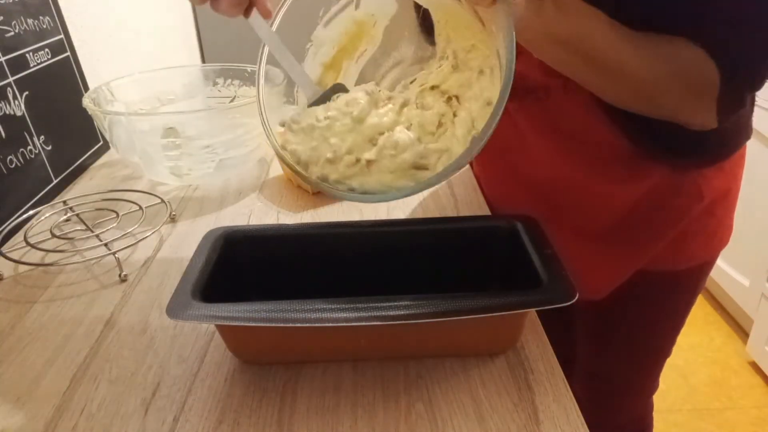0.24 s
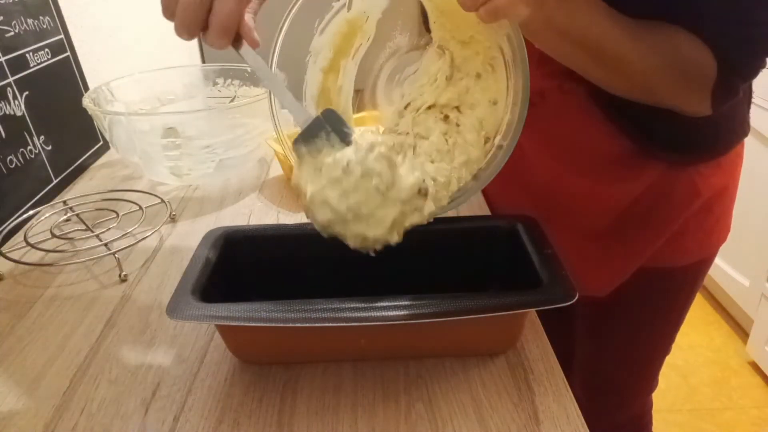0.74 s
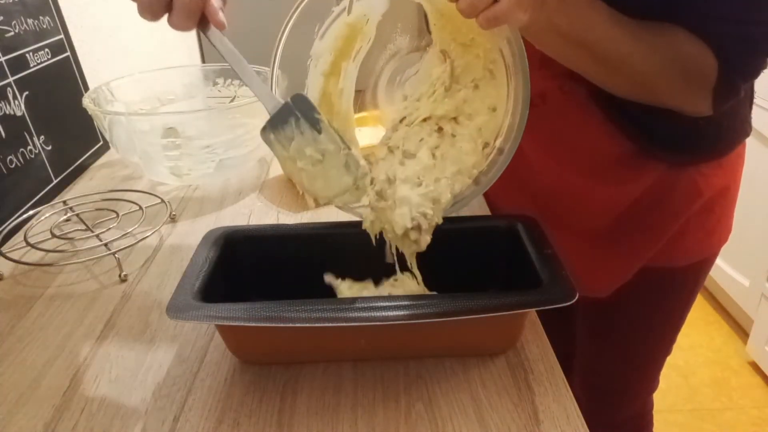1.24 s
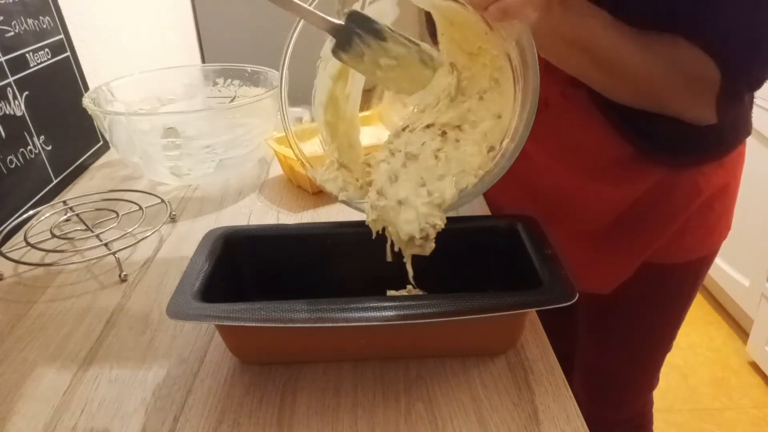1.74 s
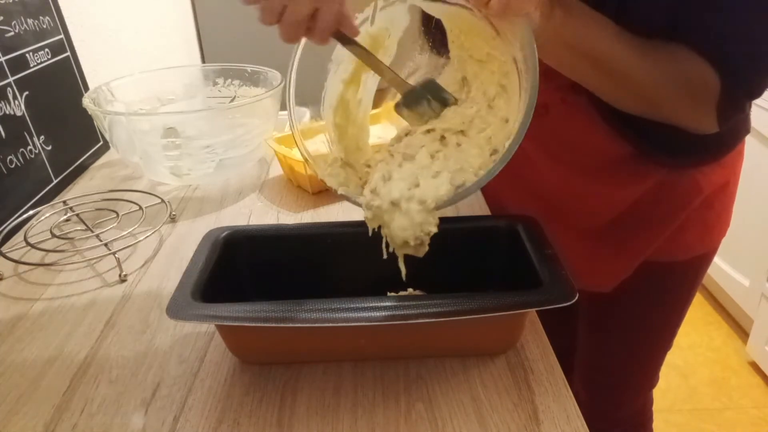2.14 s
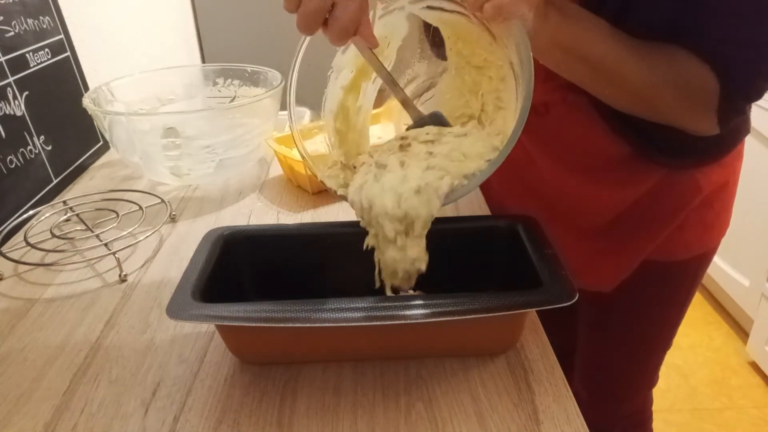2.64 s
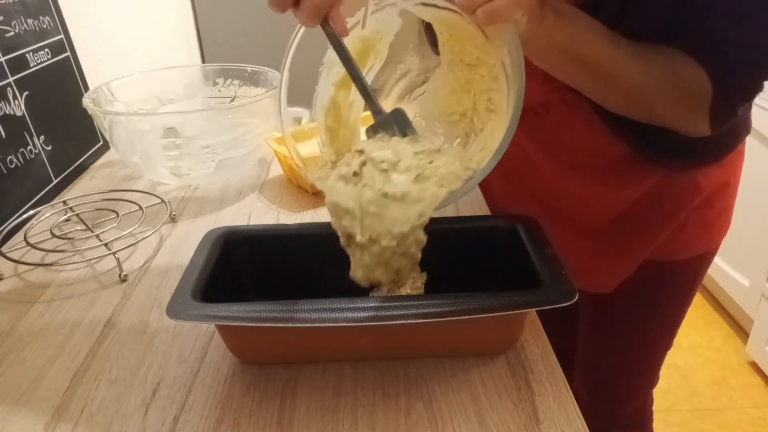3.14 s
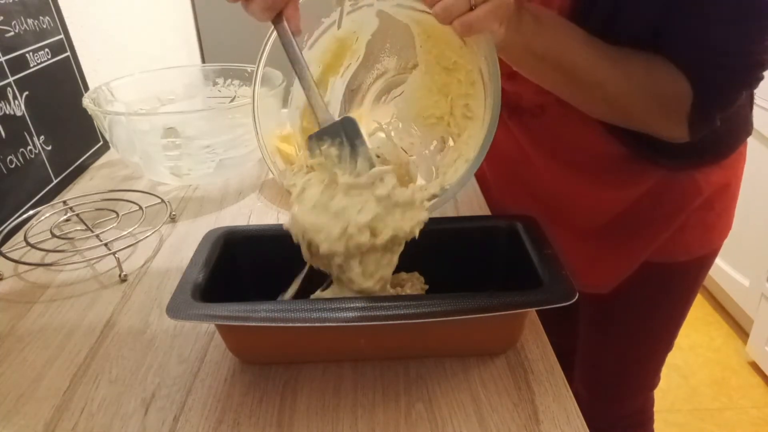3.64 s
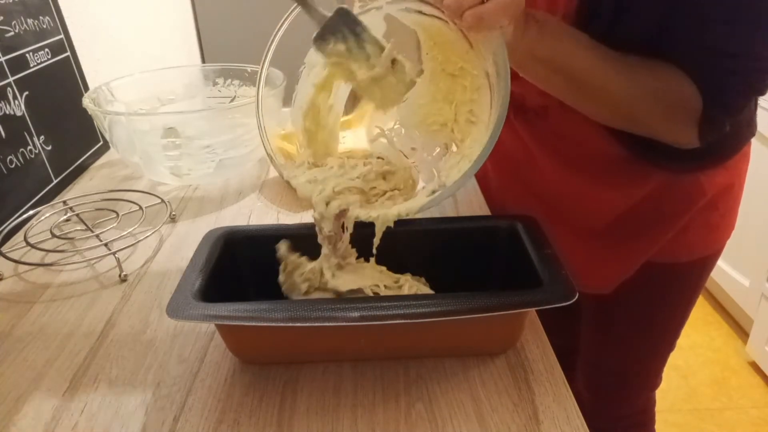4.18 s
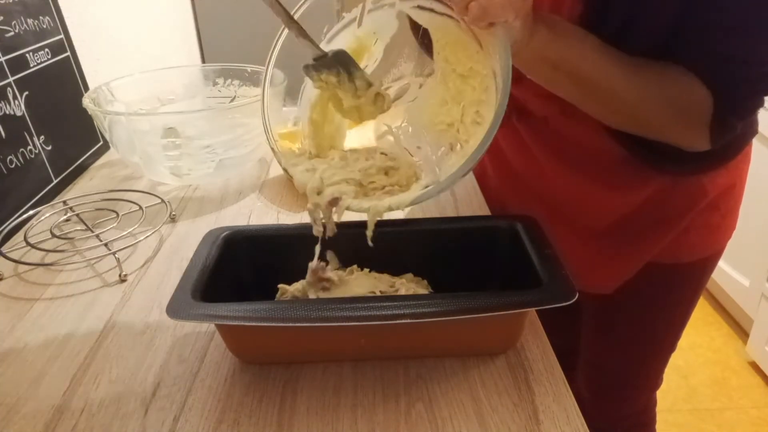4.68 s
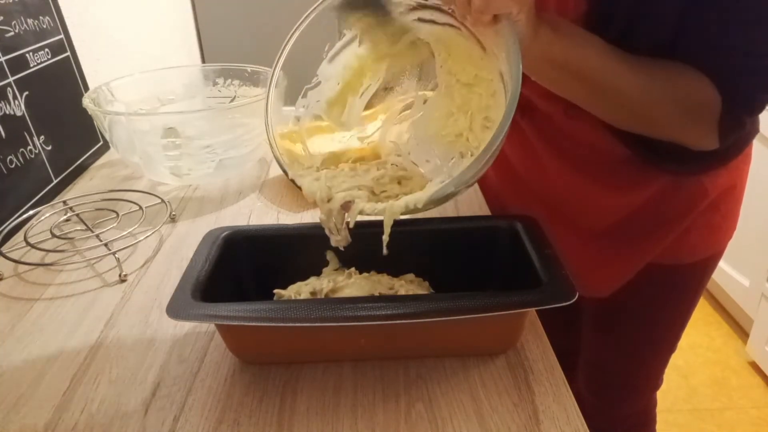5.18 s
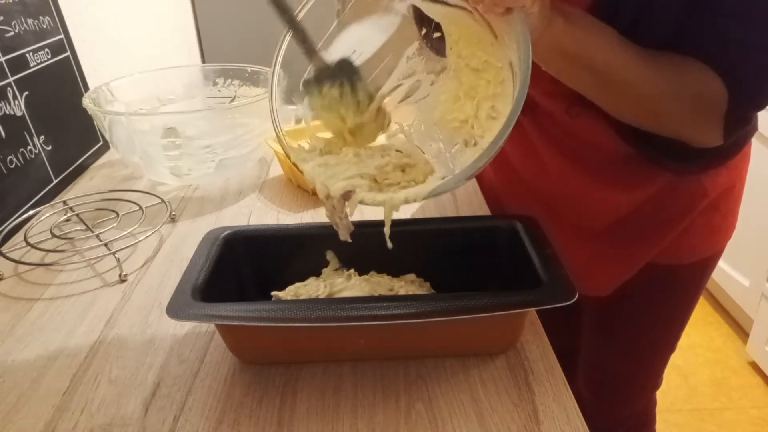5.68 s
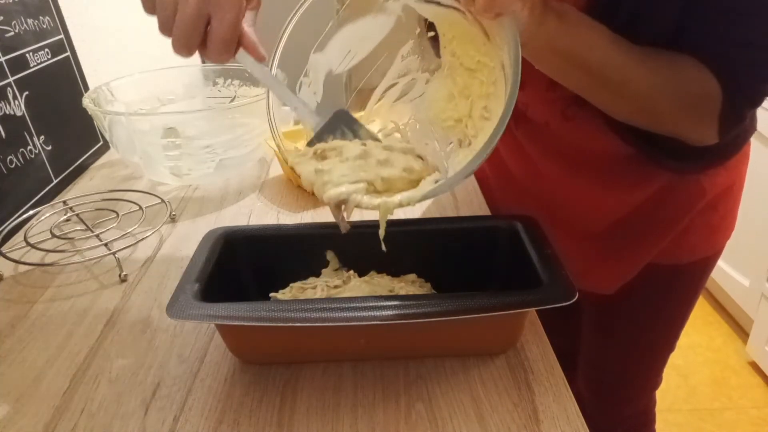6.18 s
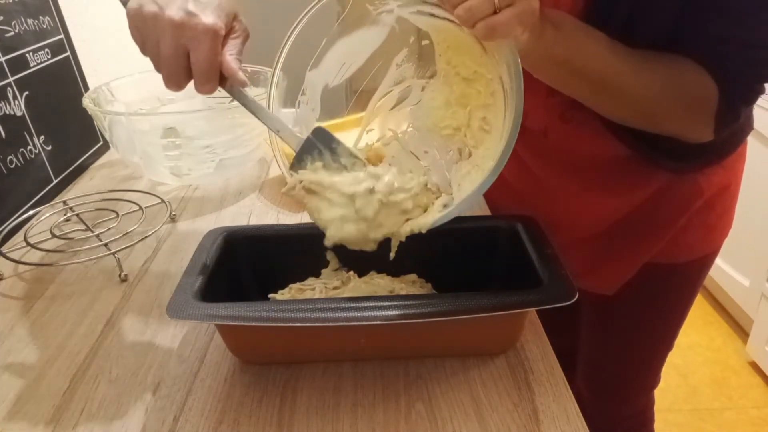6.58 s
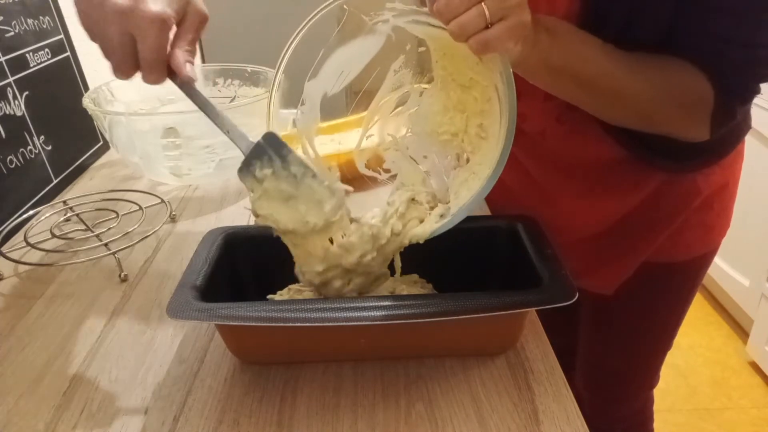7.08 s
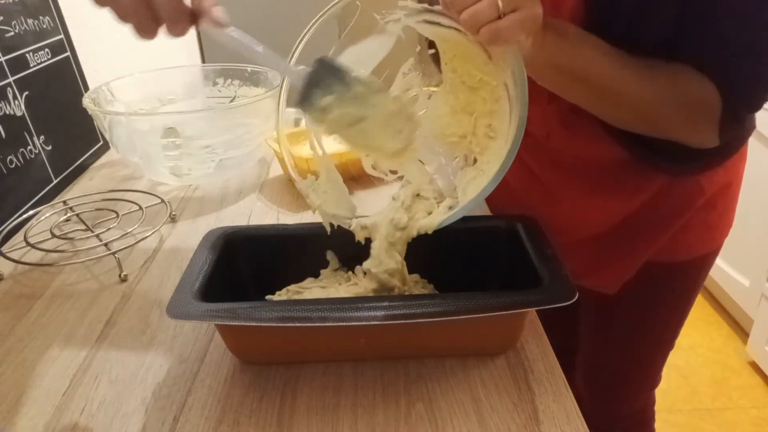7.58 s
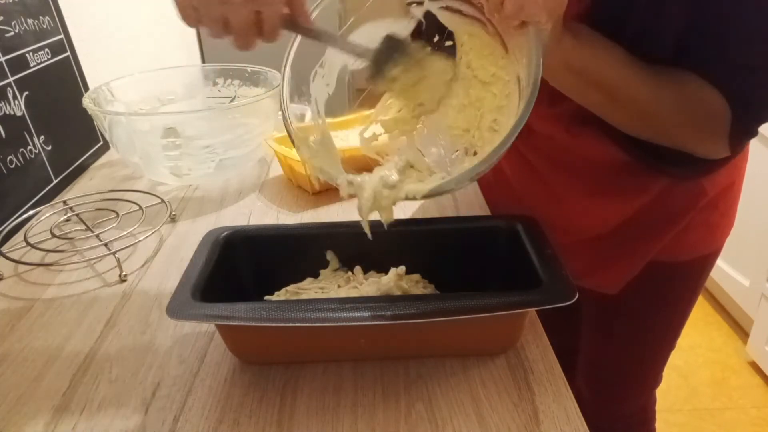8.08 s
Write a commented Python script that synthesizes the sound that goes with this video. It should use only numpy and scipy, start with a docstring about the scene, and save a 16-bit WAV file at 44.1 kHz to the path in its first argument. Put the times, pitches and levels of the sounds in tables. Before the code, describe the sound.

A spatula clacks on a glass bowl while sticky batter smacks softly and thuds into a metal tin, over a low hum.

```python
"""Scraping batter into a loaf tin.

A small, live kitchen, heard through one microphone. A spatula knocks and rubs on a glass bowl whose
ring is damped by batter. The sticky mass squelches, smacks and crackles as it is pushed and torn,
and lumps thud into the metal tin. The tiled room answers, and an appliance hums low underneath."""
import sys
import numpy as np
from scipy import signal
from scipy.fft import rfft, irfft, next_fast_len
from scipy.io import wavfile
from scipy.ndimage import uniform_filter1d, map_coordinates

SR = 44100
rng = np.random.default_rng(int(sys.argv[2]) if len(sys.argv) > 2 else 0)


def unload_audio(sound):
    """Save the sound as a 16-bit wav file, at the path given as the first command line argument."""
    columns = np.transpose(np.atleast_2d(sound))
    # keep every value between -1 and 1, then stretch to whole-number steps
    steps = np.round(np.clip(columns, -1, 1) * 32767)
    wavfile.write(sys.argv[1], SR, steps.astype(np.int16))


N = 366912
TIME, RING_TIME = np.arange(N) / SR, np.arange(SR // 2) / SR

# ringing modes of the batter-damped bowl, plus the microphone's bright peak near 9.5 kHz:
# f/Hz, relative level/dB, t60/s
BOWL_AND_MIC = [(626, -3.5, .14), (1285, -6, 0.26), (1476, -3.5, .22), (2124, -3, .12), (2324, -3.5, .2),
                (2959, -5.5, .1), (3480, -3.5, .16), (4160, -2.5, 0.14), (4400, -1.5, .38),
                (5156, -11, 0.16), (5640, -6, .16), (7960, -7, .15), (9040, -3, .15), (9400, -3.5, .17)]
# spectrum of the hard contact at the microphone: f/Hz, relative level/dB
CLACK_SPECTRUM = [(120, -34.5), (330, -7), (580, 3.5), (760, -4), (1080, -1.5), (1400, -1), (1720, -8),
                  (2200, -4.5), (4100, -1.5), (5000, -6.5), (6400, -10.5), (7900, -1), (9600, -1.5),
                  (11800, -9.5), (15000, -20.5)]
# spatula on glass; grip and batter shift the lowest wall mode:
# t/s, relative level/dB, tilt/(dB per octave), relative ring/dB, wall mode f/Hz, its relative level/dB
KNOCK_HITS = [(4.5524, -15, -0.36, -11.5, 610.6, -3), (4.663, -35.5, 2.5, -2, 610, -27),
              (4.676, -35, 2, -1.5, 620, -24), (5.9773, -24, 0.8, -20.5, 452, -10),
              (7.921, -18.5, 1, -15.5, 565, -1.5)]
def knocks(wall_t60=.11):
    """The spatula's hard edge clacks on the bowl, which rings briefly out into the room."""
    out = np.zeros(N)
    for s, db, tilt_db, ring_db, wall_hz, wall_db in KNOCK_HITS:
        contact = burst(t60=.02, rise=.001)  # the blade first squeezes through a film of batter
        clack = blow(colour(contact, lambda hz: along(CLACK_SPECTRUM, hz) + resonances(hz)))
        body = clack + amp(ring_db - 1) * blow(ring(BOWL_AND_MIC))
        body = colour(body, lambda hz: tilt_db * np.log2(np.maximum(hz, 200) / 3000))
        wall = blow(np.sin(2 * np.pi * wall_hz * RING_TIME) * amp(-60 * RING_TIME / wall_t60))
        add(out, s, amp(db + 5) * kitchen(body, wet_db=-1.5))
        add(out, s, amp(db + wall_db) * kitchen(wall, wet_db=-12))
    return low_cut(out, edge_hz=270)


def resonances(hz):
    """Boost in dB of contact noise near the bowl's modes and the microphone's bright peak."""
    peaks = sum(amp(db) ** 2 * np.exp(-((hz - peak_hz) / (55 + .018 * peak_hz)) ** 2)
                for peak_hz, db, _ in BOWL_AND_MIC)
    return 10 * np.log10(1 + 5 * peaks)


# modes of the loaf tin: f/Hz, relative level/dB, t60/s
TIN_MODES = [(335, -5, 0.065), (612, 3, 0.054), (844, -32, 0.062), (1005, 6, 0.046), (1300, 0, 0.058),
             (1590, -3.5, 0.086), (1820, -7.5, 0.029)]
# spectrum of the wet splash: f/Hz, relative level/dB
SPLASH_SPECTRUM = [(500, 4), (1500, 8.5), (3000, 3.5), (5500, -4), (9000, -6.5), (11000, -3.5),
                   (15500, -12)]
# lumps landing: t/s, level/dB, splash against thud/dB, pitch ratio (a load of batter lowers the modes)
LUMP_DROPS = [(1.113, -28, -6.5, 0.99), (1.118, -23.5, -24, 0.99), (1.182, -46, -17, 1.2),
              (1.236, -50, -16, 1), (3.759, -45, -1, .85)]
def lumps():
    """Soft lumps thud into the tin's sheet metal with a small splash."""
    out = np.zeros(N)
    for s, db, splash_db, ratio in LUMP_DROPS:
        splash = blow(colour(burst(t60=.064, rise=.0034), lambda hz: along(SPLASH_SPECTRUM, hz)))
        thud = blow(ring([(ratio * hz, mode_db, t60) for hz, mode_db, t60 in TIN_MODES]))
        add(out, s, kitchen(amp(db) * (thud + amp(splash_db) * splash), wet_db=-1.5))
    return out


# the loudest air pockets bursting in the batter: t/s, level/dB, f/Hz, width/octaves
AIR_POCKETS = [(0.436, -51, 10700, .21), (0.7446, -49.5, 9400, .05), (1.025, -53.5, 9900, .2),
               (2.024, -49.5, 8200, 0.55), (2.0496, -44, 9400, .23), (2.083, -48, 9000, .2),
               (2.18, -47, 8000, 1), (2.1863, -29, 6200, 0.41), (2.2788, -33.5, 9700, 0.36),
               (2.3597, -47.5, 10900, 0.45), (2.3966, -50, 13000, 0.4), (2.5117, -46.5, 9800, 0.18),
               (2.8306, -48.5, 6300, 0.21), (2.9178, -51.5, 10000, .22), (3.508, -48.5, 10100, .21),
               (3.759, -43, 8670, 0.17), (5.831, -57, 9100, 0.41), (7.1202, -62, 8056, 0.39),
               (8.2054, -49, 7970, 0.76), (8.2946, -48, 10500, .4), (8.311, -44, 10800, 0.27)]
def smacks():
    """An air pocket snaps open and rings for a few cycles; torn batter fizzes after it."""
    out = np.zeros(N)
    for s, db, pitch_hz, width in AIR_POCKETS:
        snap = blow(burst(t60=.004))
        fizz = amp(-4) * blow(burst(t60=.035))
        cavity = lambda hz: -20 * np.log10(1 + (np.log2((hz + 1) / pitch_hz) / width) ** 2 / 2)
        add(out, s, kitchen(amp(db) * blow(colour(snap + fizz, cavity)), wet_db=-7))
    return out


# spectrum of the blade rubbing on glass, at the microphone: f/Hz, relative level/dB
RUB_SPECTRUM = [(200, -15), (550, 3), (1200, 4.5), (1800, -3.5), (4300, 1), (6300, -6), (9400, -0.5),
                (12000, -12), (15500, -19.5)]
# rubbing strokes: t/s at full pressure, hold/s, relative level/dB
RUB_STROKES = [(.005, 0.039, -50), (.25, 0.049, -63.5), (2.026, .01, -69), (6.25, 0.12, -64.5),
               (7.8, 0.022, -69), (8.2, 0.016, -67), (8.31, .01, -68)]
def scraping():
    """Tiny slips of the blade excite the bowl's modes; the microphone hears mostly direct sound."""
    pressure = gestures(RUB_STROKES, rise_db_per_s=300, fall_db_per_s=140)
    slips = rng.standard_normal(N) * amp(2.36 * wobble(160))
    rub = pressure * unit(colour(slips, lambda hz: along(RUB_SPECTRUM, hz) + .8 * resonances(hz)))
    ringing = ring(BOWL_AND_MIC)
    singing = signal.fftconvolve(pressure * unit(slips), ringing / np.linalg.norm(ringing))[:N]
    return kitchen(amp(-2) * rub + amp(-7.5) * singing, wet_db=-11)[:N]


# colour of the wet crackle at the microphone: f/Hz, relative gain/dB
CRACKLE_COLOUR = [(1500, -14.5), (4000, -11.5), (7500, -12.5), (9600, 1.5), (11500, -8), (15500, -2)]
# the blade pulls at the batter, or a lump tears away: t/s at full strength, hold/s, relative level/dB
BATTER_PULLS = [(.02, 0.43, -73), (1.15, 0.037, -65.5), (2.035, 0.034, -55), (2.3, 0.34, -66),
                (3.0, .1, -71), (3.55, .15, -71), (3.78, .04, -67.5), (4.05, 0.09, -72.5), (5.5, .1, -74.5),
                (6.1, 0.21, -72.5), (7.78, 0.072, -79.5), (8.15, .03, -65.5), (8.31, .01, -56)]
def tearing(count=1600, pop_samples=256):
    """Stretched batter crackles with tiny pops of every size and pitch, more room than direct sound."""
    when, pitch, strength = rng.random((count, 3)).T
    pop_hz = 3500 * 4.3 ** pitch
    pop_gain = amp(-4.5 * np.log(1 - .97 * strength))  # many weak, a few strong
    cycles = pop_hz[:, None] * np.arange(pop_samples) / SR
    grains = pop_gain[:, None] * np.sin(2 * np.pi * cycles) * np.exp(-cycles / 1.5)
    places = (when * (N - pop_samples)).astype(int)[:, None] + np.arange(pop_samples)
    pops = np.bincount(places.ravel(), grains.ravel(), N)
    pulls = gestures(BATTER_PULLS, rise_db_per_s=350, fall_db_per_s=80.5)  # tears fast, relaxes slowly
    stretch = np.hypot(amp(-80.5), amp(-6) * pulls)  # the mass still creeps faintly between pulls
    crackle = stretch * unit(colour(pops, lambda hz: along(CRACKLE_COLOUR, hz)))
    return kitchen(crackle, wet_db=4)[:N]


# spectrum of the yielding batter: f/Hz, relative level/dB
SQUELCH_SPECTRUM = [(120, -18), (320, -1), (550, 1), (900, -11), (2000, -19), (5000, -33)]
# the blade sinking in: t/s at full depth, hold/s, level/dB
BLADE_PUSHES = [(2.03, 0.0089, -50.5), (2.2, 0.21, -62)]
def pushing():
    """The thick mass gives way at once in soft, low squelches, then settles."""
    lumpy = rng.standard_normal(N) * amp(3.7 * wobble(70))
    depth = gestures(BLADE_PUSHES, rise_db_per_s=600, fall_db_per_s=133)
    return depth * unit(colour(lumpy, lambda hz: along(SQUELCH_SPECTRUM, hz)))


# spectrum of a film of batter being wiped: f/Hz, relative level/dB
FILM_SPECTRUM = [(1500, -20), (3800, -4), (5000, 0.5), (9500, 0), (11500, -8), (15500, -9)]
# wipes with the flat of the blade: t/s at full pressure, hold/s, level/dB
BLADE_WIPES = [(5.47, 0.041, -62)]
def wiping():
    """Gliding on wet batter, the blade swishes without ringing the glass."""
    film = rng.standard_normal(N) * amp(2 * wobble(200))
    pressure = gestures(BLADE_WIPES, rise_db_per_s=140, fall_db_per_s=71)
    return pressure * unit(colour(film, lambda hz: along(FILM_SPECTRUM, hz)))


# swells of the low drone: t/s, level/dB
DRONE_SWELLS = [(0.0, -48.8), (0.56, -68.5), (0.8, -51.5), (1.12, -49.5), (1.84, -66.5), (2.08, -46),
                (2.32, -54.5), (2.4, -46), (2.8, -65), (2.88, -49.5), (4.0, -64), (4.8, -57), (4.96, -55),
                (5.04, -48.5), (5.2, -43.5), (5.36, -63), (5.52, -55.5), (5.68, -71), (6.0, -52),
                (6.4, -63.5), (6.64, -46.5), (6.8, -60.5), (7.12, -66), (7.76, -51.7), (8.16, -59),
                (8.3, -49)]
# steady lines of the appliance: f/Hz, level/dB, unsteadiness/dB
HUM_LINES = [(64.5, -72, 4.5), (127, -67, 4.5), (162.5, -70, 5), (201.5, -71.5, 4), (314, -75, 4.5),
             (390.6, -83.5, 4), (469.5, -70, 3.5), (566, -77.5, 3.5)]
# spectrum of the room tone: f/Hz, relative level/dB
ROOM_TONE = [(15, -64), (25, -41.5), (59, -20), (74, -14), (96, -3), (126, -17.5), (205, -9.5), (228, -21),
             (316, -15.5), (414, -19), (473, -15.5), (769, -21.5), (7630, -45), (9460, -52.5),
             (15800, -54.5)]
def hum(drone_hz=93.8, beat_depth=.61, beats_per_s=10):
    """Behind the work, an appliance's wavering drone and weaker lines lie over soft room tone."""
    beating = 1 + beat_depth * (wobble(beats_per_s) + 1j * wobble(beats_per_s))
    phase = 2 * np.pi * drone_hz * TIME + .6 * wobble(8.8)
    drone = level(DRONE_SWELLS) * unit(np.real(beating * np.exp(1j * phase)))
    lines = np.zeros(N)
    for hz, db, sway_db in HUM_LINES:
        sway = amp(sway_db * wobble(4.5))
        drift = np.sqrt(hz / 200) * wobble(6.2)
        lines += amp(db) * unit(sway * np.sin(2 * np.pi * hz * TIME + drift))
    hiss = amp(-60.5) * unit(colour(rng.standard_normal(N), lambda hz: along(ROOM_TONE, hz)))
    return drone + lines + hiss


# reverberation of the kitchen: f/Hz, t60/s
ROOM_DECAY = [(150, 0.85), (500, 0.41), (1500, 0.46), (4000, 0.44), (9000, 0.4), (15000, 0.31)]
# loss at the walls: f/Hz, relative gain/dB
WALL_LOSS = [(8500, -2.5), (14000, -2.5)]
def kitchen(x, wet_db):
    """At the microphone: the direct sound, then a diffuse tail from the tiled room."""
    hz, t, noise = signal.stft(rng.standard_normal(SR * 3 // 4), SR, nperseg=256)
    decay = amp(along(WALL_LOSS, hz)[:, None] - 60 * t / along(ROOM_DECAY, hz)[:, None])
    tail = signal.istft(noise * decay, SR, nperseg=256)[1]
    tail *= 1 - np.exp(-np.arange(len(tail)) / SR / .0008)  # echoes build up from the worktop outwards
    out = amp(wet_db) * signal.fftconvolve(x, tail / np.linalg.norm(tail))
    out[:len(x)] += x
    return out


def ring(modes, count=8, spread=.026):
    """Damped clusters of close partials, as when an uneven coat of batter splits a mode."""
    out = np.zeros(len(RING_TIME))
    for hz, db, t60 in modes:
        partials = hz * (1 + spread * rng.uniform(-1, 1, (count, 1)))
        cluster = np.sin(2 * np.pi * (partials * RING_TIME + rng.random((count, 1)))).sum(axis=0)
        out += amp(db) * blow(cluster * amp(-60 * RING_TIME / t60))
    attack = 1 - np.exp(-RING_TIME / .0004)
    return low_cut(out * attack, edge_hz=260)


def burst(t60, rise=.0001):
    """A puff of noise that swells and dies away, equally strong at all pitches."""
    envelope = amp(-60 * RING_TIME / t60) * (1 - np.exp(-RING_TIME / rise))
    puff = rng.standard_normal(len(RING_TIME)) * envelope
    power = uniform_filter1d(np.abs(rfft(puff)) ** 2, size=40)
    bin_hz = np.fft.rfftfreq(len(puff), 1 / SR)
    return colour(puff, lambda hz: -10 * np.log10(np.interp(hz, bin_hz, power)))


def gestures(rows, rise_db_per_s, fall_db_per_s):
    """Gain per sample of hand movements that each swell, hold and fade."""
    gain = np.zeros(N)
    for s, held, db in rows:
        before, after = np.clip(s - TIME, 0, 1), np.clip(TIME - s - held, 0, 2)
        gain += amp(db - rise_db_per_s * before - fall_db_per_s * after)
    return gain


def low_cut(x, edge_hz):
    """Small objects radiate almost no bass."""
    return signal.sosfilt(signal.butter(3, edge_hz, "highpass", fs=SR, output="sos"), x)


def colour(x, gain_db):
    """Minimum-phase filter with the given dB as a function of frequency."""
    size = 2 * next_fast_len(len(x) // 2 + 4096)
    gain = amp(gain_db(np.fft.rfftfreq(size, 1 / SR)))
    cepstrum = irfft(np.log(np.maximum(gain, 1e-6)))
    cepstrum[1:size // 2] *= 2
    cepstrum[size // 2 + 1:] = 0
    return irfft(rfft(x, size) * np.exp(rfft(cepstrum)))[:len(x)]


def amp(db):
    """Decibels to gain."""
    return 10 ** (np.asarray(db) / 20)


def unit(x):
    """Scale to rms 1."""
    return x / np.sqrt(np.mean(x ** 2) + 1e-20)


def blow(x):
    """Scale to the energy of two milliseconds at rms 1."""
    return x * np.sqrt(.002 * SR / (np.sum(x ** 2) + 1e-20))


def along(points, hz):
    """Interpolate (f/Hz, value) points on a log axis."""
    point_hz, values = np.transpose(points)
    return np.interp(np.log(hz + 1), np.log(point_hz + 1), values)


def level(rows):
    """Gain per sample from (t/s, level/dB) rows."""
    s, db = np.transpose(rows)
    return amp(np.interp(TIME, s, db))


def wobble(rate):
    """A smooth random curve, rate knots a second."""
    knots = rng.standard_normal(int(N * rate / SR) + 4)
    return map_coordinates(knots, [TIME * rate])


def add(track, s, x):
    """Mix x into the track at time s."""
    part = track[max(round(s * SR), 0):][:len(x)]
    part += x[:len(part)]


def scene():
    """Bowl, tin, batter and appliance at one microphone."""
    return (knocks() + lumps() + smacks() + scraping() + wiping() + pushing() + tearing() + hum())[None]


def record(dry):
    """The recorder keeps nothing above 15.9 kHz."""
    size = next_fast_len(N + SR // 2)
    passband = np.fft.rfftfreq(size, 1 / SR) < 15900
    return irfft(rfft(dry, size) * passband, size)[..., :N]


dry = scene()
out = record(dry)
unload_audio(out)
```